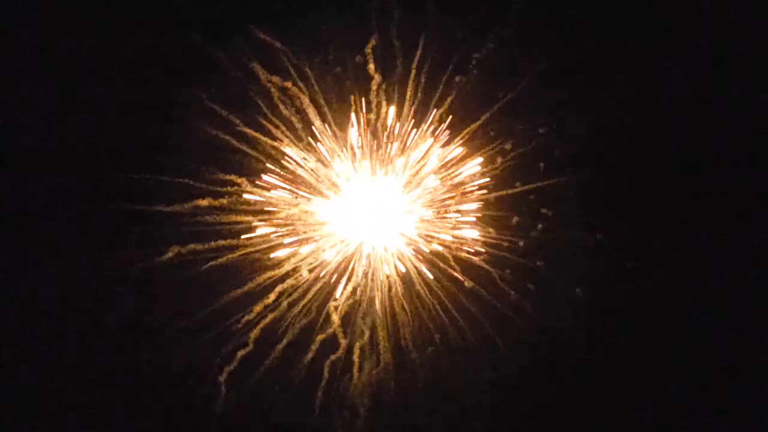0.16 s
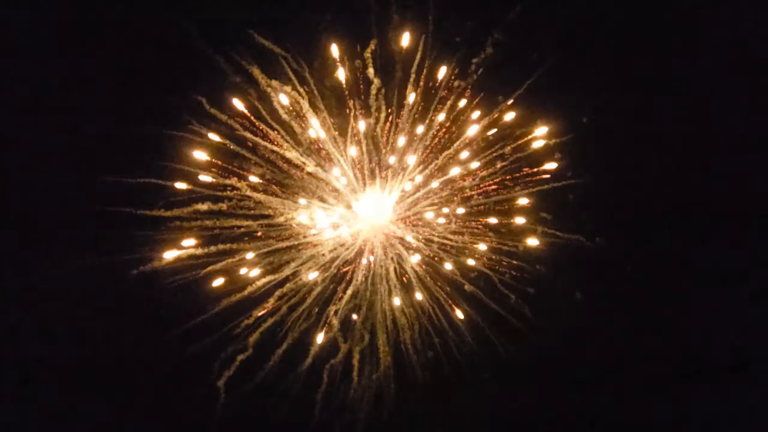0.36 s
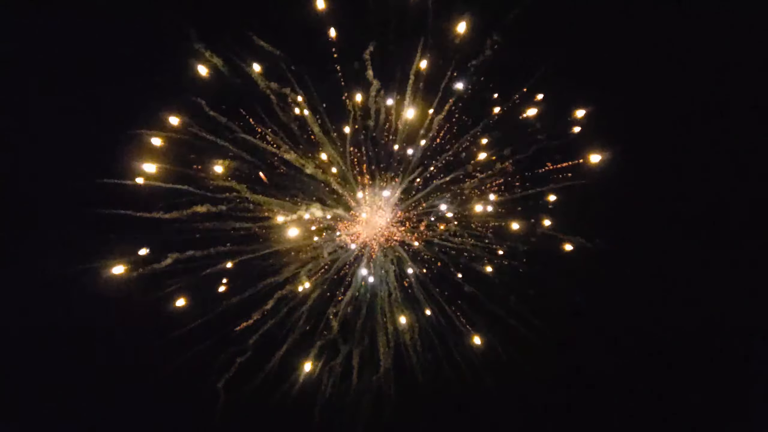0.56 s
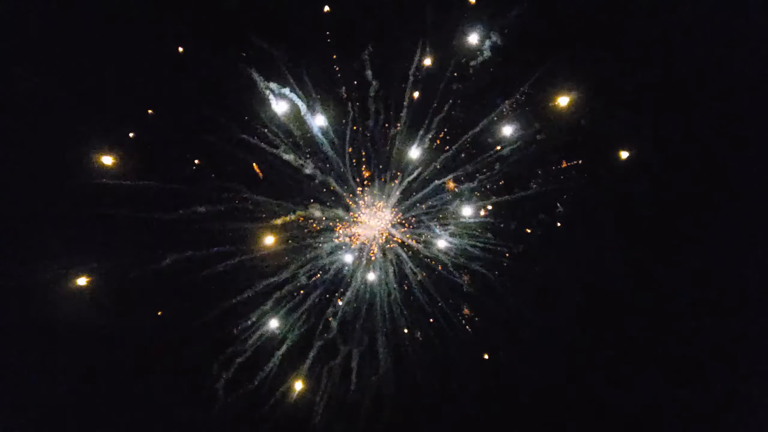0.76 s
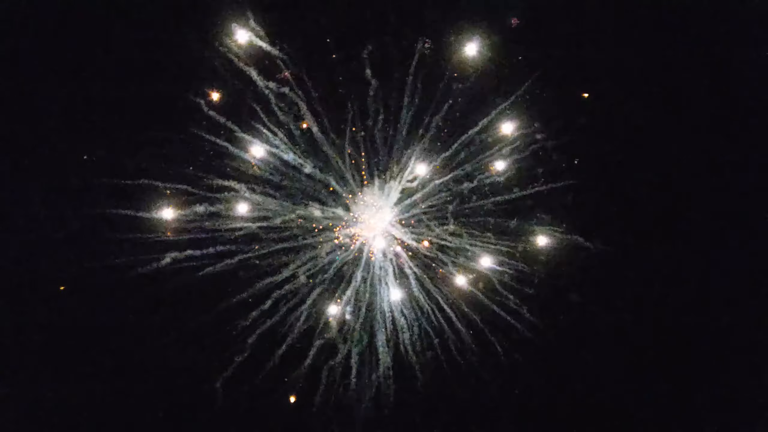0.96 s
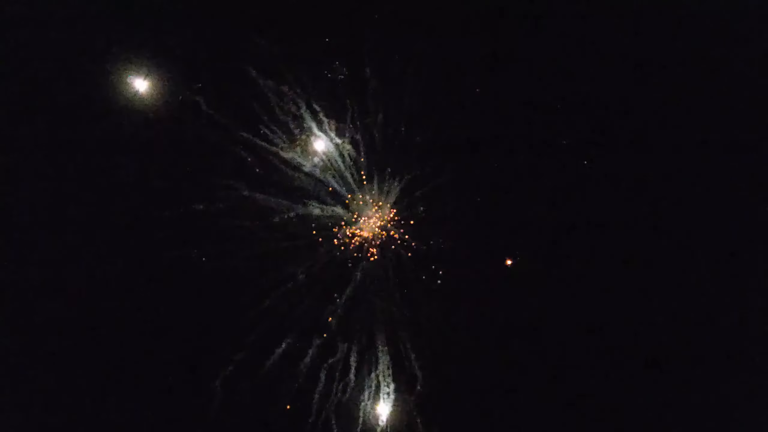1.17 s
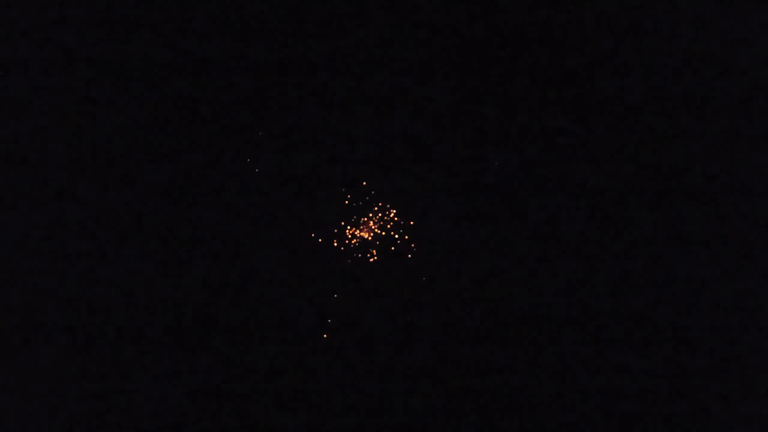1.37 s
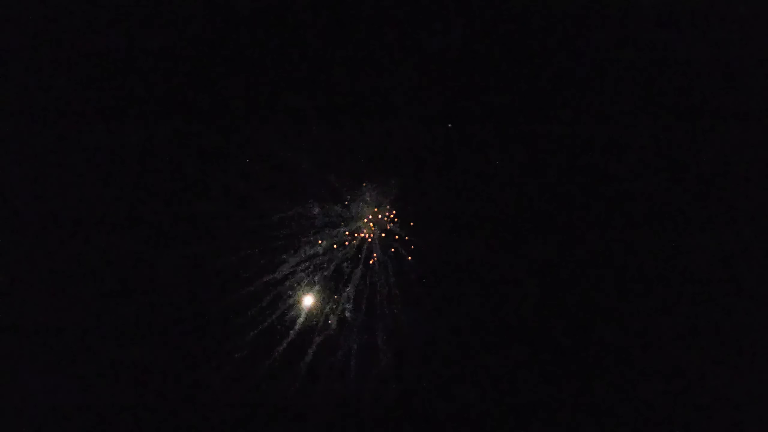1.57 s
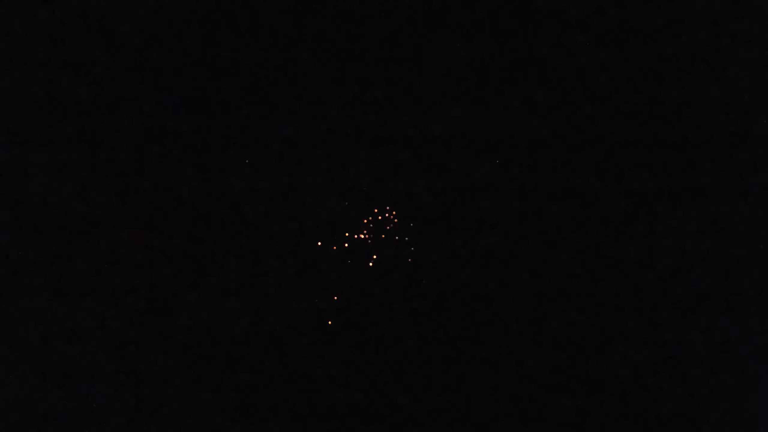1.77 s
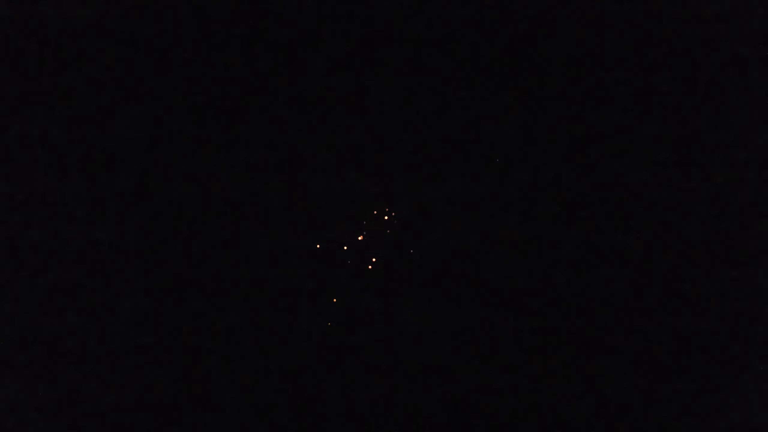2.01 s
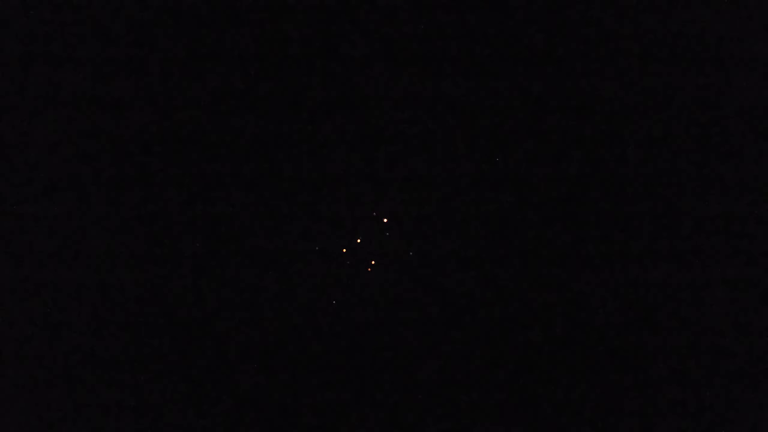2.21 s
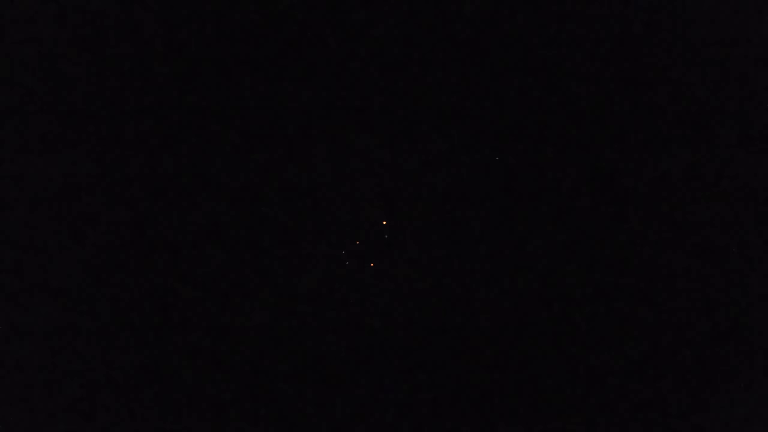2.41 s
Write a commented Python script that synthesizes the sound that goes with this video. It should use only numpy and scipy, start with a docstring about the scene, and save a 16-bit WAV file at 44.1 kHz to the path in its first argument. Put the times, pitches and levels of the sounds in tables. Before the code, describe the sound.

A firework bursts with one hard, clipped bang over fading rumble; its echo rolls outdoors while stars crackle in a swelling cloud, thin to single pops, and a tube thump follows. Stereo microphones, level ducking after the bang.

```python
"""A firework cake at night, outdoors, over the low rumble of earlier shots, which is fading noise.
A shell bursts with a loud bang, sharp pressure pulses with near reflections; noise echoes roll it back.
Its stars break into a swelling crackle of double-shock clicks that thins to single pops.
The next shot thumps out of its tube, a snap and a late low pulse with one echo; two last pops follow it."""
import sys
import numpy as np
from scipy import signal
from scipy.fft import rfft, irfft
from scipy.io import wavfile

SR = 44100
rng = np.random.default_rng(int(sys.argv[2]) if len(sys.argv) > 2 else 0)


def unload_audio(sound):
    """Save the sound as a 16-bit wav file, at the path given as the first command line argument."""
    columns = np.transpose(np.atleast_2d(sound))
    # keep every value between -1 and 1, then stretch to whole-number steps
    steps = np.round(np.clip(columns, -1, 1) * 32767)
    wavfile.write(sys.argv[1], SR, steps.astype(np.int16))


N = 108045
T = np.arange(N) / SR

# The burst, then its near reflections: [t/s, boom level/dB, crack level/dB]
BURST = [(0.2404, 0, 1), (0.2499, -1.5, -12), (.2557, -15, -5), (.2630, -6, -22)]
# Spectrum of the deep pulse in one arrival: [f/Hz, level/dB]
BOOM_SPECTRUM = [(20, 12), (50, 41), (100, 37), (170, 37.5), (350, 36), (520, 30.5), (750, 12),
                 (1500, 12.5), (4000, -11), (16000, -16)]
# Spectrum of the ragged edge in one arrival: [f/Hz, level/dB]
CRACK_SPECTRUM = [(100, -15), (900, 23), (1600, 12.5), (4300, 4), (7400, 8.5), (9000, -17), (15500, 10.5)]
# Spectrum of the scatter from nearby things: [f/Hz, level/dB]
SCATTER_SPECTRUM = [(40, 6), (90, 31), (250, 32), (500, 22), (900, 21), (2000, 17), (4500, 8), (7400, -5),
                    (8800, -9), (15500, -2)]
# Time for that scatter to fall by 60 dB: [f/Hz, decay time/s]
SCATTER_T60 = [(60, 0.22), (300, 0.24), (1000, 0.11), (4000, 0.12), (15000, 0.23)]
BOOM_LAG_HZ = 172
CRACK_DECAY_S, SCATTER_START_S, SCATTER_RISE_S = 0.0011, 0.249, 0.0013

# The clearest star pops: [t/s, relative level/dB, left minus right/dB, treble/dB]
POPS = [(0.7191, -10, 4, -3), (0.7686, -9, 0, 0), (0.7946, -2, 3, -2), (0.8322, -8, 3, -4),
        (0.8715, -3, -1, 1), (0.9218, -4, 6, -2), (0.9774, 0, 1, 1), (0.987, 1, -1, -1), (0.9952, 1, 1, -1),
        (1.0231, 1, 2, 1), (1.0538, 4, -6, -3), (1.0597, 2, 1, -1), (1.1049, 2, 0, -3), (1.1289, 3, 2, -2),
        (1.1382, 3, -1, -2), (1.1422, 3, 0, -1), (1.1807, 1, -3, 0), (1.1868, 2, 4, -5), (1.2013, 2, -1, 1),
        (1.2043, 3, 3, 1), (1.2424, 2, 3, -1), (1.2307, 2, -4, -2), (1.2729, 2, -1, 1), (1.2777, 3, -3, -3),
        (1.289, 3, 4, -3), (1.3161, 2, 0, 0), (1.328, 3, 0, 0), (1.3405, 4, 1, -3), (1.3732, 1, 1, -5),
        (1.3978, 1.5, 0, -7), (1.4042, -1, 0, -3), (1.4194, 0, -2, -5), (1.4414, -2, -1, -2),
        (1.4543, 0, -1, -4), (1.4584, 5, -3, -5), (1.4678, 0, 1, -4), (1.4827, 0, -3, -3),
        (1.4869, 0, -3, -4), (1.5515, 1, -1, -2), (1.5614, 0, -2, -1), (1.5833, 0, -3, -5),
        (1.6071, 2, 2, -7), (1.627, 0.5, -1, -7), (1.9141, -4.5, 0, -12), (2.0266, 0, -2, -6)]
# Spectrum shared by all pops: [f/Hz, level/dB]
POP_SPECTRUM = [(40, -28), (300, 4), (550, 5), (1600, -5), (3600, -1.5), (5000, -5), (7300, -4.5),
                (8800, -14.5), (15500, -17.5)]
# The cloud of small pops: [t/s, relative density, level/dB]
CRACKLE = [(.62, 3, -19), (.76, 14, -17), (.845, 12, -16), (.87, 45.3, -13), (1.0, 50, -10),
           (1.13, 65, -8.5), (1.3, 70, -7), (1.38, 35, -10), (1.43, 20, -17), (1.48, 40, -10.5),
           (1.51, 2, -32)]
# Time for the scatter near the stars to fall by 60 dB: [f/Hz, decay time/s]
STAR_NEAR_T60 = [(300, 0.12), (10000, 0.032)]
CLEAR_POP_TRIM_DB = -0.5
CRACKLE_SPREAD_DB, CRACKLE_JITTER_S = 4.5, 0.005
# A pop is two shocks with suction between them; its pitch is one over their spacing
POP_HZ, POP_SPREAD_OCTAVES, REAR_SHOCK, SUCTION = 2200, 0.25, 0.6, 1.28
POP_SPLINTER_DB, POP_SPLINTER_DECAY_S, POP_SPLINTER_START_S = -6, 0.00051, 0.0003
GROUND_DELAY_S, GROUND_DB, GROUND_HZ = 0.0092, -7, 4500
LEFT_LEAD_S = 0.00007  # the most by which a pop reaches the left microphone first
POP_TREBLE_HZ = 7100
STAR_NEAR_DB, STAR_FAR_DB = -14, -16

# The launch, then its echo from a wall: [t/s, thump level/dB, snap level/dB, snap low-pass f/Hz]
LAUNCH = [(1.843, 0, 1, 14030), (1.8595, -7.5, -8.5, 2000)]
# Spectrum of the thump of the tube: [f/Hz, level/dB]
THUMP_SPECTRUM = [(20, -22), (50, 17), (110, 23.5), (170, 19), (240, 5.5), (380, 10.5), (800, -5),
                  (3000, -40)]
# Spectrum of the knock of the lift charge: [f/Hz, level/dB]
SNAP_SPECTRUM = [(200, 4.5), (800, 4), (1300, 11.5), (1900, 18), (3350, 12), (3900, -2.5), (5200, -8),
                 (7700, 1), (9000, -10), (15500, -6.5)]
# Time for the scatter near the launch to fall by 60 dB: [f/Hz, decay time/s]
LAUNCH_NEAR_T60 = [(100, 0.24), (2000, .1), (7000, 0.26), (13000, 0.12)]
SNAP_SPLINTER_DB, SNAP_SPLINTER_DECAY_S = -12, 0.002

# Spectrum of the far roll of the bang: [f/Hz, level/dB]
ROLL_SPECTRUM = [(30, -96.5), (70, -28), (140, -29), (270, -12), (400, -16), (560, -23.5), (900, -23.5),
                 (2000, -44), (6000, -49)]
# Course of the roll: [t/s, level/dB]
ROLL_LEVEL = [(.25, 8), (0.428, -23), (0.489, -8), (0.549, -5.5), (0.594, 6), (.62, 0), (0.676, 0.5),
              (.72, -4), (.8, -0.5), (.95, -3), (1.04, -2), (1.3, -5.5), (1.7, -13.5), (2.45, -26.5)]
# Spectrum of the rustle of small echoes: [f/Hz, level/dB]
RUSTLE_SPECTRUM = [(30, -57), (150, -34), (700, -34.5), (2000, -29.5), (5000, -34), (7400, -29.5),
                   (8800, -36.5), (15500, -32.5)]
# Course of the rustle: [t/s, level/dB]
RUSTLE_LEVEL = [(.25, 10.5), (.33, -3.5), (.39, -3.5), (.45, 3), (.59, 2.5), (0.721, 0.5), (1.2, -3),
                (2.45, -23.5)]
# Spectrum of the deep tail of the bang: [f/Hz, level/dB]
DEEP_SPECTRUM = [(20, -54), (50, -27), (80, -20.5), (130, -31), (220, -36), (600, -64)]
ROLL_DULLING_DB_PER_KHZ_S, RUSTLE_DULLING_DB_PER_KHZ_S = 11, 5
DEEP_FADE_DB_PER_S = 21

# Spectrum of the rumble of earlier shots, at time zero: [f/Hz, level/dB]
RUMBLE_SPECTRUM = [(30, -105.5), (70, -36), (140, -33.5), (230, -26.5), (340, -26.5), (550, -38),
                   (1100, -48), (2800, -72.5), (5000, -80), (7300, -71), (9000, -90), (15000, -69)]
# How fast the rumble dies away: [f/Hz, fade/dB per s]
RUMBLE_FADE = [(50, 4), (150, 5), (300, 2), (6000, 5), (12000, 14)]

# Likeness of the two channels in diffuse noise: [f/Hz, correlation]
CHANNEL_LIKENESS = [(25, 0.83), (70, 0.99), (300, 0.91), (700, 0.32), (1500, 0), (4000, 0.25), (15000, 0)]
# Time for the long outdoor tail to fall by 60 dB: [f/Hz, decay time/s]
FAR_T60 = [(200, 3.6), (1500, 5.55), (4000, 3.5), (15000, 1.1)]
NEAR_DELAY_S, FAR_RISE_S = 0.014, 0.0091
SMEAR_HZ = 4500  # in the pops and the launch, treble above this arrives a little ahead

# Imbalance of the microphones: [f/Hz, left minus right/dB]
LEFT_DB = [(60, 1), (300, 1.5), (1500, 0.5), (3500, -1), (7000, 9), (15000, 1.5)]
CEILING = 0.88  # full scale is 1
DUCK_ABOVE_DB, DUCK_SHARE, RECOVER_DB_PER_S, DUCK_SMOOTH_S = -25, 0.56, 43, 0.034
EDGE_HZ = 16100


def burst():
    """The shell's blast wave, its near reflections and a short diffuse scatter; the bass lags the front."""
    out = np.zeros((2, N))
    boom = bass_late(pulse(BOOM_SPECTRUM), BOOM_LAG_HZ)
    for s, boom_db, crack_db in BURST:
        crack = convolve(splinter(CRACK_DECAY_S), pulse(CRACK_SPECTRUM))
        add(out, s, amp(boom_db) * boom)
        add(out, s, amp(crack_db) * crack)
    scatter = decaying_noise(SCATTER_T60, size=256) * (1 - np.exp(-T / SCATTER_RISE_S))
    add(out, SCATTER_START_S, convolve(unit(scatter), pulse(SCATTER_SPECTRUM)))
    return out


def stars(count=560):
    """Clear single star pops amid a cloud of smaller ones that swells and thins."""
    out = np.zeros((2, N))
    for s, db, pan_db, treble_db in POPS:
        add(out, s, amp(db + CLEAR_POP_TRIM_DB) * pop(pan_db, treble_db))
    times, density, level = np.transpose(CRACKLE)
    # equal shares of the summed density give the small pops their times
    due = np.cumsum(np.interp(T, times, density, left=0, right=0))
    for k in range(count):
        share = (k + rng.random()) / count
        s = np.searchsorted(due, due[-1] * share) / SR
        s += rng.uniform(-1, 1) * CRACKLE_JITTER_S
        db = np.interp(s, times, level) + CRACKLE_SPREAD_DB * min(rng.standard_normal(), 1)
        add(out, s, amp(db) * pop(pan_db=rng.normal(0, 3.9)))
    return convolve(out, pulse(POP_SPECTRUM))


def pop(pan_db=0, treble_db=0, size=1024):
    """One star: a double shock of random spacing, with a ragged edge and a duller bounce off the ground."""
    # the right microphone may lead by up to 1.76 times as much as the left
    lag = rng.uniform(-1.76, 1) * LEFT_LEAD_S * SR / 2
    click = np.sinc(np.arange(size) - 10 + np.array([[lag], [-lag]]))
    add(click, POP_SPLINTER_START_S, amp(POP_SPLINTER_DB) * splinter(POP_SPLINTER_DECAY_S))
    bounce_s = GROUND_DELAY_S + rng.uniform(-0.0005, 0.0005)
    add(click, bounce_s, amp(GROUND_DB) * dull(click, GROUND_HZ))

    hz = np.fft.rfftfreq(size, 1 / SR)
    pitch_hz = POP_HZ * 2 ** rng.normal(0, POP_SPREAD_OCTAVES)
    turns = hz / pitch_hz
    half = np.exp(-1j * np.pi * turns)  # delay by half the spacing
    suction = SUCTION * np.sinc(turns) * half
    shocks = (1 - suction + REAR_SHOCK * half ** 2) / np.hypot(1, REAR_SHOCK)
    shelf = 1 - 1 / (1 + (hz / POP_TREBLE_HZ) ** 2)
    shaped = irfft(rfft(unit(click)) * shocks * amp(treble_db * shelf ** 2))
    return shaped * amp([[pan_db / 2], [-pan_db / 2]])


def launch():
    """The lift charge: a compact knock, the tube's thump just behind it, and a duller throw from a wall."""
    out = np.zeros((2, N))
    thump = bass_late(pulse(THUMP_SPECTRUM), hz=260)
    for s, thump_db, snap_db, dull_hz in LAUNCH:
        snap = dull(amp(snap_db) * pulse(SNAP_SPECTRUM), dull_hz)
        ragged = convolve(splinter(SNAP_SPLINTER_DECAY_S), snap)
        add(out, s, snap + amp(thump_db) * thump)
        add(out, s, amp(SNAP_SPLINTER_DB) * ragged)
    return out


def echoes():
    """The bang returns as a deep tail, plus a far roll and a rustle of small echoes that the air dulls."""
    start = BURST[0][0]

    def returning(spectrum, level, dulling, size):
        """Diffuse echoes that lose treble with time on the way."""
        def field_db(t, hz):
            """Spectrum and course of level, less the treble lost."""
            lost_db = dulling * hz / 1000 * np.maximum(t - start, 0)
            return read(spectrum, hz) + np.interp(t, *np.transpose(level)) - lost_db
        return noise(field_db, size)

    roll = returning(ROLL_SPECTRUM, ROLL_LEVEL, ROLL_DULLING_DB_PER_KHZ_S, size=1024)
    rustle = returning(RUSTLE_SPECTRUM, RUSTLE_LEVEL, RUSTLE_DULLING_DB_PER_KHZ_S, size=512)
    deep = noise(lambda t, hz: read(DEEP_SPECTRUM, hz) - DEEP_FADE_DB_PER_S * (t - start), size=2048)
    fade_in = np.clip((T - start) / 0.03, 0, 1)
    return (deep + roll + rustle) * fade_in


def rumble():
    """Earlier shots still dying away as diffuse noise, slowest in the low mids."""
    return noise(lambda t, hz: read(RUMBLE_SPECTRUM, hz) - read(RUMBLE_FADE, hz) * t, size=2048)


def outdoors(x, near_t60, near_db, far_db):
    """Adds brief scatter from things a few metres off, after a gap, and a long faint tail."""
    near = unit(decaying_noise(near_t60, size=256))
    far = unit(decaying_noise(FAR_T60) * (1 - np.exp(-T / FAR_RISE_S)))
    response = amp(far_db) * far
    add(response, NEAR_DELAY_S, amp(near_db) * near)
    return x + convolve(x, response)


def noise(field_db, size=512):
    """Stereo noise shaped by field_db(s, Hz), nearly mono in the bass."""
    overlap = size * 3 // 4
    hz, t, z = signal.stft(rng.standard_normal((2, N)), SR, nperseg=size, noverlap=overlap)
    hz = hz[:, None]
    same = np.clip(read(CHANNEL_LIKENESS, hz), -1, 1)
    z[1] = same * z[0] + np.sqrt(1 - same ** 2) * z[1]
    return signal.istft(z * amp(field_db(t, hz)), SR, nperseg=size, noverlap=overlap)[1][:, :N]


def decaying_noise(t60, size=512):
    """Diffuse noise that falls by 60 dB in the time the table gives for each frequency."""
    return noise(lambda t, hz: -60 * t / read(t60, hz), size)


def pulse(spectrum, size=8192):
    """The sharpest causal pressure pulse with this spectrum (minimum phase)."""
    hz = abs(np.fft.fftfreq(size, 1 / SR))
    log_gain = np.log(amp(read(spectrum, hz)))
    response = np.exp(np.conj(signal.hilbert(log_gain)))
    return irfft(response[:size // 2 + 1])[:size // 2]


def splinter(decay_s, size=256):
    """A very short ragged puff of noise, different at each microphone."""
    return unit(rng.standard_normal((2, size)) * np.exp(-T[:size] / decay_s))


def dull(x, hz):
    """A gentle one-pole low-pass."""
    r = np.exp(-2 * np.pi * hz / SR)
    return signal.lfilter([1 - r], [1, -r], x)


def bass_late(x, hz):
    """An all-pass that delays what lies below hz and leaves the spectrum as it is."""
    r = np.exp(-2 * np.pi * hz / SR)
    return signal.lfilter([r, -1], [1, -r], x)


def amp(db):
    """Decibels to gain."""
    return 10 ** (np.asarray(db) / 20)


def read(points, hz):
    """A table read on a log-frequency axis."""
    f, value = np.transpose(points)
    return np.interp(np.log(hz + 1), np.log(f + 1), value)


def add(mix, s, sound):
    """Mixes a sound in at time s."""
    start = max(round(s * SR), 0)
    part = mix[..., start:][..., :sound.shape[-1]]
    part += sound[..., :part.shape[-1]]


def convolve(x, response):
    """Stereo convolution, cut to the scene's length."""
    return signal.fftconvolve(np.atleast_2d(x), np.atleast_2d(response), axes=1)[:, :N]


def unit(x):
    """Scales each channel to energy 1."""
    return x / np.sqrt((x ** 2).sum(-1, keepdims=True) + 1e-20)


def scene():
    """All sources at the two microphones."""
    bang = burst() + echoes()
    crackle = outdoors(stars(), STAR_NEAR_T60, STAR_NEAR_DB, STAR_FAR_DB)
    shot = outdoors(launch(), LAUNCH_NEAR_T60, near_db=-24, far_db=-25)
    return bang + bass_late(crackle + shot, SMEAR_HZ) + rumble()


def record(dry):
    """Unequal microphones, clipping of peaks, gain control that ducks loud sound, then the band limit."""
    tilt_db = read(LEFT_DB, np.fft.rfftfreq(N, 1 / SR)) / 2
    tilted = irfft(rfft(dry) * amp([tilt_db, -tilt_db]), N)
    heard = np.clip(tilted, -CEILING, CEILING)

    r = np.exp(-1 / (DUCK_SMOOTH_S * SR))
    power = signal.lfilter([1 - r], [1, -r], (heard ** 2).mean(0))
    power_db = 10 * np.log10(power + 1e-12)
    # the held level falls back no faster than the recovery rate
    recovery_db = RECOVER_DB_PER_S * T
    held_db = np.maximum.accumulate(power_db + recovery_db) - recovery_db
    over_db = np.maximum(held_db - DUCK_ABOVE_DB, 0)
    duck_db = signal.lfilter([1 - r], [1, -r], DUCK_SHARE * over_db)

    edge = signal.firwin(255, EDGE_HZ, window=("kaiser", 9), fs=SR)
    return signal.oaconvolve(heard * amp(-duck_db), edge[None], "same")


dry = scene()
out = record(dry)
unload_audio(out)
```